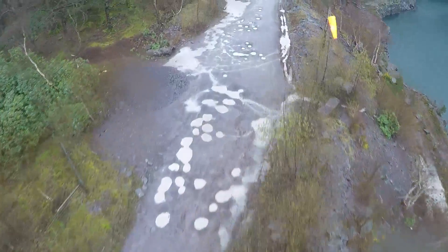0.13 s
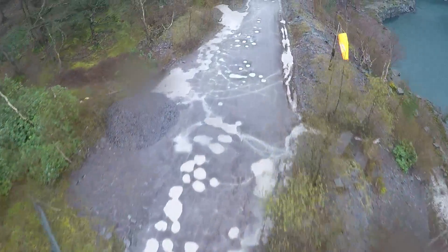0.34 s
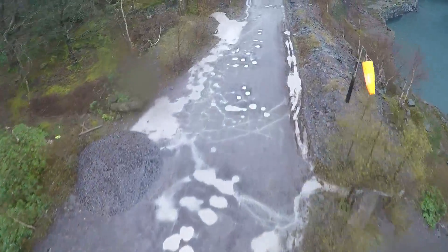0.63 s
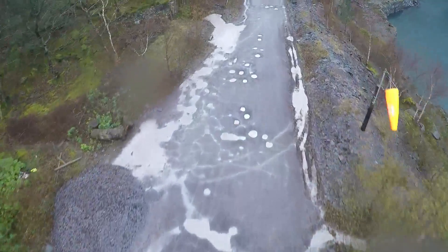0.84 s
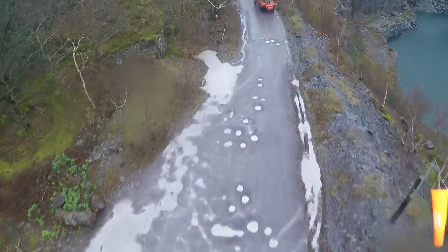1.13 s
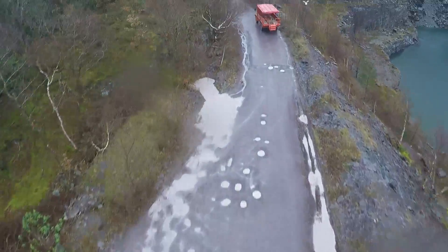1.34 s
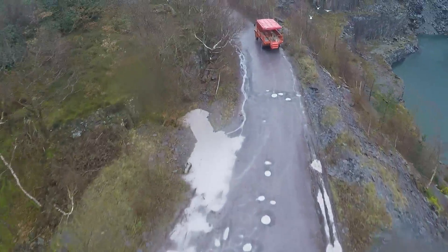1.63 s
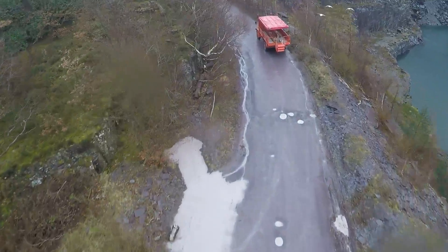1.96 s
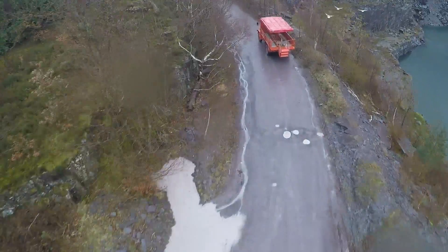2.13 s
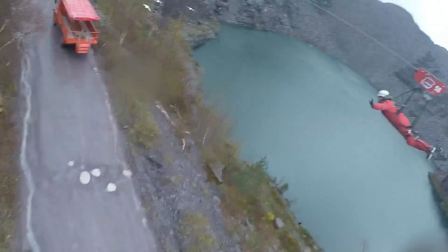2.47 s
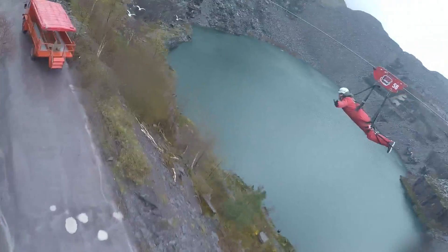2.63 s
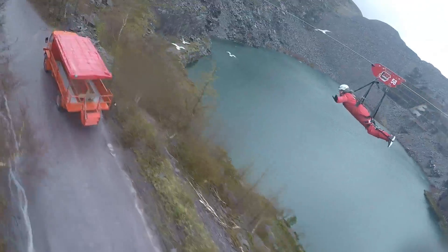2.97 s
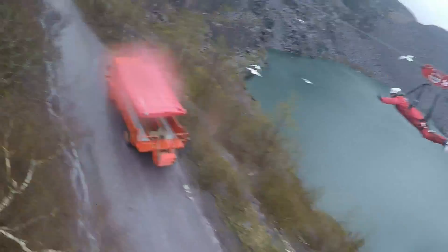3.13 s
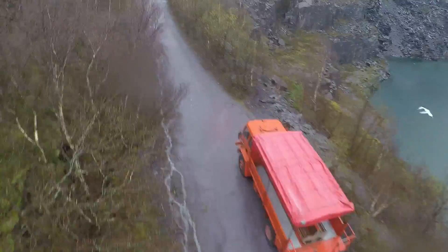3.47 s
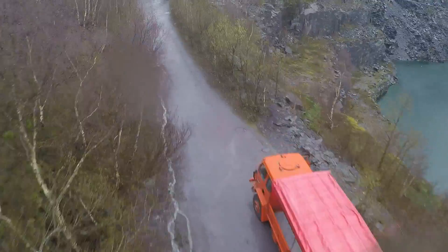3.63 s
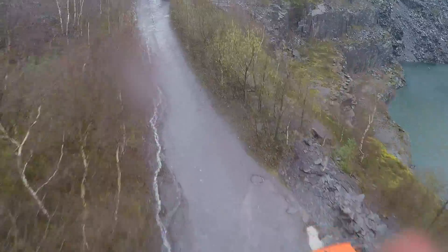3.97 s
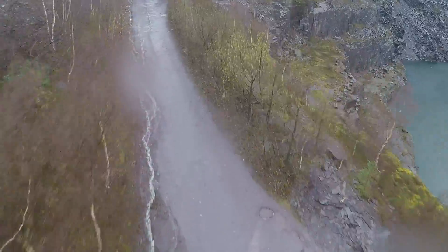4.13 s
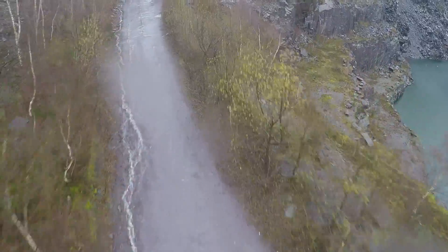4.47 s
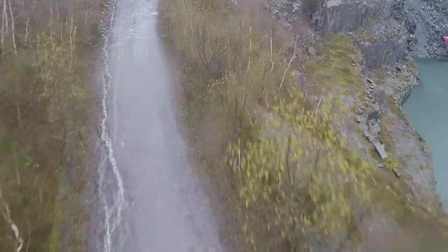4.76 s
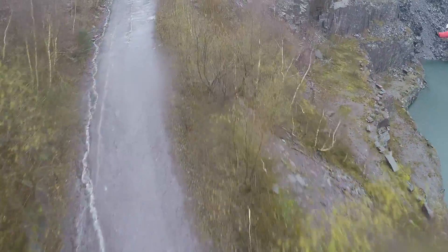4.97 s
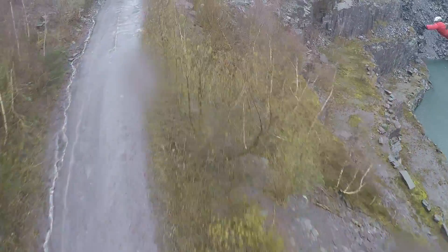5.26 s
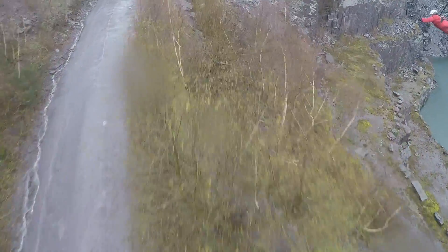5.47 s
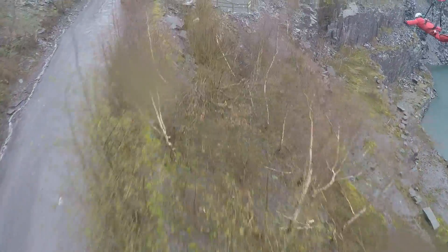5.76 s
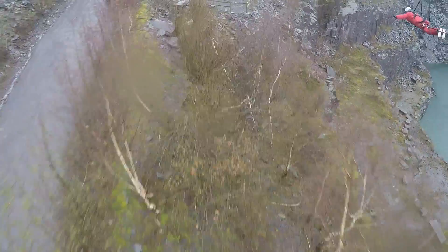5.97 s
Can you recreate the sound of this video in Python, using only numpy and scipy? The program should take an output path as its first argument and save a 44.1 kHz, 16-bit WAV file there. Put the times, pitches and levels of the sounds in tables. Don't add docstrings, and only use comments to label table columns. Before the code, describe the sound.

From a camera riding a zip line outdoors, trolley wheels rasp continuously along the steel cable, coloured hollow by the sealed plastic housing. Low wind thumps underneath. Around two and a half to three seconds, the wind buffets harder and a rough whine rises, then sinks. Light raindrops tick close on the plastic; a few larger ones crack sharply and the steady noise briefly drops in level.

```python
import sys
import numpy as np
from scipy import signal
from scipy.fft import rfft, irfft, next_fast_len
from scipy.io import wavfile
from scipy.ndimage import uniform_filter1d, map_coordinates

SR = 44100
rng = np.random.default_rng(int(sys.argv[2]) if len(sys.argv) > 2 else 0)


def transcribe(signal):
    frames = np.atleast_2d(signal).T
    limited = np.clip(frames, -1, 1)
    pcm = np.round(limited * 32767).astype(np.int16)
    wavfile.write(sys.argv[1], SR, pcm)


def linear_from_db(decibels):
    return 10 ** (np.asarray(decibels, float) / 20)


N = 269010


def unit(x):
    return x / np.sqrt(np.mean(x ** 2) + 1e-20)


def curves(rows):
    time_s, *columns = np.transpose(rows)
    return [np.interp(np.arange(N) / SR, time_s, column) for column in columns]


def wobble(knots_hz):
    knots = rng.standard_normal(int(N * knots_hz / SR) + 4)
    return map_coordinates(knots, [np.arange(N) * knots_hz / SR])


def noise(gain, patchy_db):
    z = signal.stft(rng.standard_normal(N + 512), nperseg=512)[2]
    field = uniform_filter1d(rng.standard_normal(z.shape), size=8, axis=0)
    field = uniform_filter1d(field, size=8, axis=1)
    x = signal.istft(z * linear_from_db(patchy_db * unit(field)), nperseg=512)[1]
    m = next_fast_len(len(x))
    hz = np.fft.rfftfreq(m, 1 / SR) + 1
    return unit(irfft(rfft(x, m) * gain(hz), m)[:N])


def slopes(points):
    point_hz, point_db = np.transpose(points)
    return lambda hz: linear_from_db(np.interp(np.log(hz), np.log(point_hz), point_db, left=-120, right=-120))


def modes(table):
    def gain(hz):
        powers = [(linear_from_db(db) / (1 + ((centre_hz ** 2 - hz * hz) / (hz * width_hz)) ** 2)) ** 2
                  for centre_hz, width_hz, db in table]
        return np.sqrt(sum(powers))
    return gain


# time_s, turn into the wind [0-1], nod [0-1]
HEAD = [(0, 0.2, 0.2), (.5, 0.03, 0.06), (1, 0.09, 0), (1.6, 0.1, 0.12), (1.7, 0.04, 0.75),
        (2.25, 0.12, 0.26), (2.31, 0.04, 0.25), (2.42, 0.71, 0.4), (2.58, 0.97, 0.2), (2.7, 0.65, 0.04),
        (2.88, 1.02, 0.23), (3.12, 0.86, 0.32), (3.28, 0.12, .7), (3.6, 0, 0.73), (4.26, 0.13, 1.2),
        (4.8, 0.13, 0.93), (5.4, 0.01, 1), (6.1, 0, 0.38)]
# time_s, share of first speed [0-1]
SPEED = [(0, 1), (3.9, .885), (6.1, .85)]
# time_s, load_db
LOAD = [(0, -1), (.13, .5), (.73, 0), (1.2, -1), (1.55, .5), (2.24, 1.5), (2.36, -2.5), (2.9, 0.5),
        (3.3, -1.5), (3.67, 0.5), (4.2, 0.5), (4.45, -1), (4.75, 0), (4.98, 0), (5.3, -0.5), (5.55, -0.5),
        (5.82, -3.5), (6.1, -1)]
# time_s, level_db, length_s
JOLTS = [
    (0.034, 5.5, 0.013),
    (0.09, -3.5, .02),
    (0.252, 3.5, 0.014),
    (0.794, -10.5, 0.038),
    (0.883, 3.5, 0.022),
    (1.58, 2.5, 0.013),
    (4.77, -5, .015),
]
# centre_hz, width_hz, level_db
WALL = [(2565, 560, 1.5), (3093, 580, -9.5), (5440, 260, -17.5), (5803, 370, -21)]
CAVITY = [(1564, 210, -3.5), (1769, 300, 0.5), (1820, 540, -5.5)]
LENS = [(3907, 470, 2), (4240, 400, -21), (4660, 110, -5.5)]
SEAM = [(7160, 1270, 5.5), (5320, 600, -11), (9750, 4200, -6.5), (11900, 1300, -30), (14000, 2000, -26)]
FLANK = [(2285, 690, 0)]
GAP = [(6370, 700, 0)]
# level_db, turn_db, nod_db, load_share [dB/dB], slowest_db [at the slowest speed]
SHELL = [
    (-17.5, 2, -5, 1.3, -2.3),
    (-29, 9, 1.5, 0.35, -0.05),
    (-33.5, 2, -0.5, 0.86, -0.2),
    (-47, 9, 2, 0.45, -2.5),
    (-30, -6, 7.5, 1.3, 0.7),
    (-58.5, -2, 3, 0.55, 14.5),
    (-51, 11, .5, 0.99, -4.5),
    (-61.5, 19, -4, .5, 7),
    (-25, 1.8, -5, 2, -3.5),
    (-36.5, .3, -5, 1.3, -2.1),
]


def wheels():
    t = np.arange(N) / SR
    turn, nod = curves(HEAD)
    slowed = (1 - curves(SPEED)[0]) / (1 - SPEED[-1][1])
    controls = [turn, nod, curves(LOAD)[0], slowed]
    jolt_db = sum(db * np.exp(-((t - s) / length_s) ** 2) for s, db, length_s in JOLTS)
    swing_hz, swing_s, swing_db, swing_dies_s = 1.72, 0.19, 6, 1.2
    swing = swing_db * np.cos(2 * np.pi * swing_hz * (t - swing_s)) * np.exp(-t / swing_dies_s)
    # resonances, patchy_db, jolt_share, swing_share; in the order of SHELL
    groups = [(WALL[:1], 1.0, 1, 0), (CAVITY, 0.34, 0, 0), (LENS, 0.23, .3, 0), (SEAM[:1], 1.5, 0, 1),
              (FLANK, 0.9, 1, 0), (SEAM[1:2], 0.9, 0, 0), (SEAM[2:], 1.0, 0, 0), (GAP, 1.2, 0, 0),
              (WALL[1:2], 1.4, .8, 0), (WALL[2:], 0.81, .3, 0)]
    hiss = np.zeros(N)
    for (base_db, *shares), (table, patchy_db, jolt_share, swing_share) in zip(SHELL, groups):
        level_db = base_db + np.dot(shares, controls) + jolt_share * jolt_db + swing_share * swing
        hiss += linear_from_db(level_db) * noise(modes(table), patchy_db)
    rasp_db = 0.77 * wobble(60) + 0.54 * wobble(18) + 0.9 * wobble(300)
    return linear_from_db(rasp_db) * hiss


# time_s, strength_db, large_eddies_db
WIND = [(0, 0, -1), (.4, 1, 0), (.7, -0.5, 1), (.95, -1, 4.5), (1.3, 0, -3), (1.55, 0, 1.5), (1.9, 1, -1),
        (2.35, 3, -2.5), (3.3, 0, -1.5), (3.55, 1, -3), (4.2, 1.5, 0), (4.45, -3.5, 1), (4.7, 1, -0.5),
        (5.2, 1, -1), (5.75, -3.5, 3), (5.88, -4.5, 8.5), (5.98, -1, 5.5), (6.1, -1.5, -2)]
# pitch_hz, density_db [dB per Hz]
THUMP = [(7.1, -56), (12, -5), (38, 4), (51, -0.5), (81, -13), (110, -26), (140, -64), (240, -120)]
BUFFET = [(45, -31), (75, 1.5), (120, 0), (190, -3), (260, -20)]
FLUTTER = [(140, -25), (200, -3), (300, 1.5), (400, -4), (520, -14), (700, -33.5)]
RUSH = [(380, -3), (520, 0.5), (680, -2.5), (760, -0.5), (880, -5), (970, -13), (1350, -1), (1700, -28)]
# level_db, turn_db, nod_db, strength_share [dB/dB], eddy_share [dB/dB]
PORT = [
    (-17.5, 3.5, -1.5, 2.6, 0.88),
    (-26.5, 22, -0.5, 0.31, 1.14),
    (-28.5, 18, 2.5, 0.44, 0.067),
    (-38, 7, 1.5, 0.3, 0.035),
]


def wind():
    controls = np.array(curves(HEAD) + curves(WIND))
    thump_db, buffet_db, flutter_db, rush_db = (db + np.dot(shares, controls) for db, *shares in PORT)
    eddy = wobble(14)
    thump = linear_from_db(thump_db) * noise(slopes(THUMP), patchy_db=1.1)
    buffet = linear_from_db(buffet_db + 0.54 * eddy) * noise(slopes(BUFFET), patchy_db=-1.3)
    flutter = linear_from_db(flutter_db + 1.2 * eddy) * noise(slopes(FLUTTER), patchy_db=0.57)
    rush = linear_from_db(rush_db + 0.71 * eddy) * noise(slopes(RUSH), patchy_db=-0.8)
    push = buffet + flutter
    push = push + .12 * (push ** 2 - np.mean(push ** 2))
    return thump + push + rush


def ring(hz, t60_s, chance):
    t = np.arange(SR // 20) / SR
    rise = 1 - np.exp(-t / 0.00022)
    return np.sin(2 * np.pi * (hz * t + chance)) * linear_from_db(-60 * t / t60_s) * rise


def struck(group, db, chance):
    return sum(linear_from_db(db + mode_db) * ring(hz * (0.953 + 0.043 * c), t60_s, 0.41 * c)
               for (hz, t60_s, mode_db), c in zip(group, chance))


# time_s, crack_db, ring_6600hz_db, ring_3800hz_db, ring_2100hz_db
SPLATS = [
    (1.612, -4, 7.5, 1, 7),
    (4.3971, 7.5, -15, -6, -17),
    (4.6688, -34, 22, 8, 26.5),
    (4.994, -4.5, 0.5, -6, 0.5),
    (5.893, 2.5, -2, -19, -16),
    (5.9855, 8, -10, -5, -13),
]
# time_s, crack_db, snap_db, ring_6600hz_db
TICKS = [(0.6024, -29, -15, -3), (0.7174, -33, -20, -5), (1.2066, -16, -23, -14), (1.4624, -18, -22, 3),
         (1.4924, -25, -13, 9), (1.504, -19, -12, -9), (1.5244, -31, -16, -1), (1.5733, -16, -13, 0),
         (1.6168, -16, -11, 3), (2.0133, -35, -9, -4), (2.1535, -34, -10, 9), (2.2314, -24, -22, -1),
         (2.607, -20, -19, 2), (2.8704, -34, -29, -4), (3.6306, -33, -24, 1), (4.0804, -31, -10, -9),
         (4.0904, -16, -9, 8), (4.3294, -28, -20, 12), (4.4134, -35, -25, 12), (4.4987, -15, -19, -6),
         (4.6199, -13, -19, 4), (4.6414, -33, -22, 7), (4.9706, -25, -15, 3), (5.0195, -25, -22, 2),
         (5.1617, -35, -46, -1), (5.3438, -37, -26, 2), (5.3662, -32, -24, 16), (5.5802, -11.5, -12, -16),
         (5.7643, -37, -25, 17), (5.9034, -28, -14, 6)]
# pitch_hz, t60_s, level_db
CRACK = [(7700, .004, -1), (8900, .0035, 0), (10000, .0035, 1)]
# pitch_hz, t60_s, level_db
SNAP = [(11200, 0.0028, 8.5), (13700, .003, 3), (14400, 0.0032, 2)]
# pitch_hz, t60_s, level_db
PLASTIC = [
    [(6590, 0.0048, -2), (7150, 0.005, -6)],
    [(3870, 0.0074, 2), (3800, 0.003, -11), (4390, 0.0049, -3.5)],
    [(2410, 0.01, 5), (1850, 0.016, -4), (2006, 0.05, -8.5)],
]


def rain():
    out = np.zeros(N + SR)
    splat_snap_db = -18
    drops = [(s, db, splat_snap_db, *rings_db) for s, db, *rings_db in SPLATS] + list(TICKS)
    chances = rng.random((len(drops), 5, 3))
    for (s, db, snap_db, *rings_db), chance in zip(drops, chances):
        hit = struck(CRACK, -8.5, chance[0]) + struck(SNAP, snap_db + 2, chance[1])
        for group, ring_db, c in zip(PLASTIC, rings_db, chance[2:]):
            hit = hit + struck(group, ring_db, c)
        out[round((s + .001) * SR):][:len(hit)] += linear_from_db(db) * hit
    return out[:N]


# start_s, end_s, first_hz, level_db
WHINES = [(0, .75, 1150, -51), (.6, 1.7, 1113, -50), (.55, 1.75, 1197, -47), (1.6, 2.4, 1160, -45),
          (.5, 1.3, 1380, -51), (1.7, 2.5, 1382, -46), (2, 3.75, 1761, -19.5), (3, 3.9, 1085, -53),
          (5, 5.9, 1084, -51), (5.2, 6.2, 1167, -47), (5.2, 6, 1395, -45), (5.6, 6.2, 1500, -48)]


def whines():
    t = np.arange(N) / SR
    speed, turn = curves(SPEED)[0], curves(HEAD)[0]
    whistle_hz, whistle_db, facing_db = 4638, -52, 12
    out = linear_from_db(whistle_db) * np.sin(2 * np.pi * np.cumsum(whistle_hz * (1 + .005 * wobble(70))) / SR)
    for start_s, end_s, first_hz, db in WHINES:
        loud = db > -40
        progress = np.clip((t - start_s) / (end_s - start_s), 0, 1)
        hz = first_hz * speed / speed[round(start_s * SR)]
        hz = hz * (1 + (.002 + .003 * loud) * wobble(70))
        level_db = db + 2 + 1.5 * wobble(14) + loud * facing_db * (turn - 1)
        swell = np.sqrt(abs(np.sin(np.pi * progress))) * linear_from_db(level_db)
        flicker = .9 + .35 * wobble(50) if loud else 1
        out += swell * flicker * np.sin(2 * np.pi * np.cumsum(hz) / SR)
    return out


# time_s, depth_db, hold_s
DUCKS = [
    (1.581, 10, 0.25),
    (2.328, 7, 0.7),
    (4.986, 3.5, 0.26),
    (5.997, 5, .2),
]


def gain_control():
    t = np.arange(N) / SR
    drop_s, drop_share, recover_db_per_s = 0.049, 0.71, 11
    cuts_db = []
    for s, db, hold_s in DUCKS:
        times_s = [s, s + drop_s, s + hold_s, s + hold_s + db / recover_db_per_s]
        cuts_db.append(np.interp(t, times_s, [0, drop_share * db, db, 0]))
    return linear_from_db(-np.max(cuts_db, axis=0))


def scene():
    return (gain_control() * (wheels() + wind() + whines()) + rain())[None]


# pitch_hz, share of moments [0-1]
KEPT = [(10000, 1), (11200, .9), (12000, .62), (12500, .3), (13600, .24), (14600, .14), (15200, .06),
        (15500, .018)]


def thrift(x, chance_db, follow):
    hz, _, z = signal.stft(x, SR, nperseg=2048)
    bands = z[:1024].reshape(128, 8, -1)
    db = 10 * np.log10(np.mean(abs(bands) ** 2, 1) + 1e-20)
    db = db - follow * uniform_filter1d(db, size=15, axis=1) + chance_db * rng.standard_normal(db.shape)
    rank = db.argsort(1).argsort(1) / db.shape[1]
    band_hz = hz[:1024].reshape(128, 8).mean(1)
    share = np.interp(band_hz, *np.transpose(KEPT))
    kept = rank >= 1 - share[:, None]
    z[:1024] = (bands * kept[:, None]).reshape(1024, -1)
    z[hz > 16300] = 0
    return signal.istft(z, SR, nperseg=2048)[1][:N]


def starve(x, source):
    edge_hz, near_s, core_s, burst_db = 10500, .07, .008, -30
    m = next_fast_len(N)
    edge = np.clip((np.fft.rfftfreq(m, 1 / SR) - edge_hz) / 1500, 0, 1)
    highs, source_highs = irfft(rfft([x, source], m) * edge, m)[:, :N]
    burst = 1. * (abs(source_highs) > linear_from_db(burst_db))
    near, core = (uniform_filter1d(burst, size=round(s * SR)) > 1e-6 for s in (near_s, core_s))
    return x - highs * uniform_filter1d(1. * (near & ~core), size=64)


def roll_off(x):
    return signal.sosfilt(signal.butter(12, 16520, fs=SR, output="sos"), x)


def record(dry):
    clipped = np.clip(dry[0], -.97, .97)
    thinned = thrift(clipped, chance_db=1.8, follow=.85)
    mix = starve(thinned, dry[0])[None]
    return roll_off(mix)


dry = scene()
out = record(dry)
transcribe(out)
```